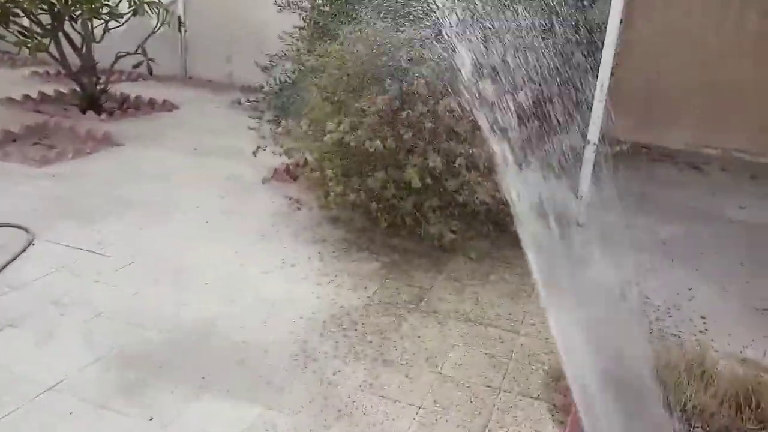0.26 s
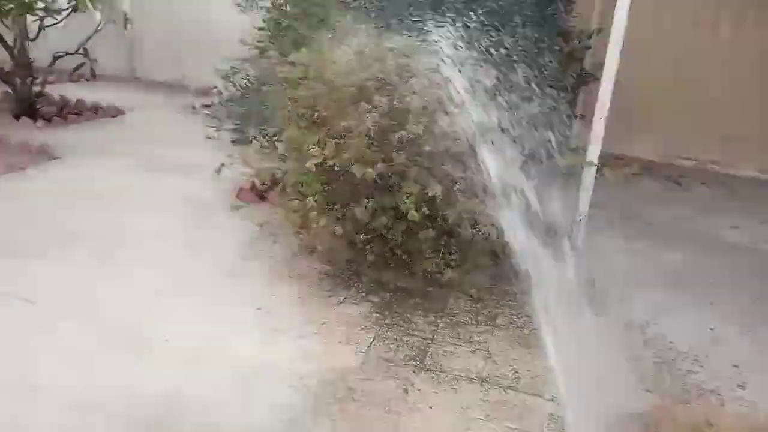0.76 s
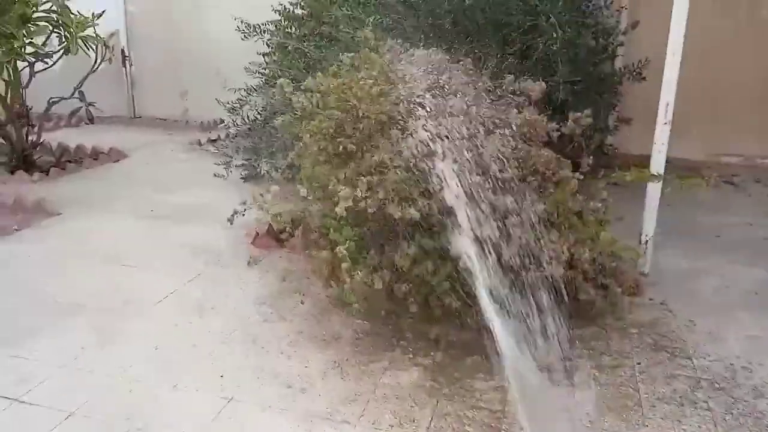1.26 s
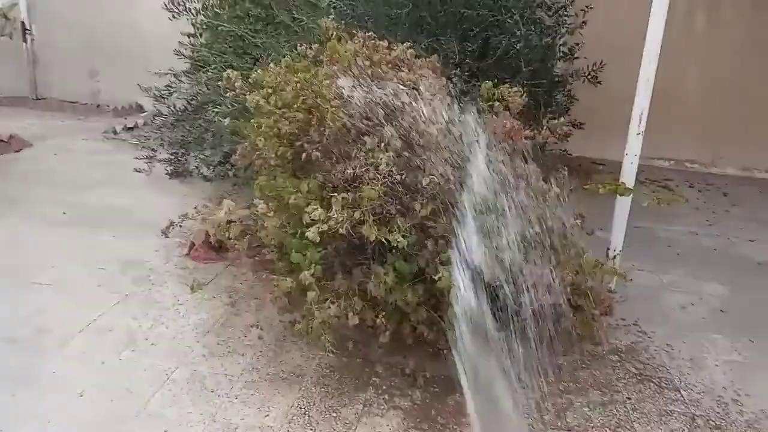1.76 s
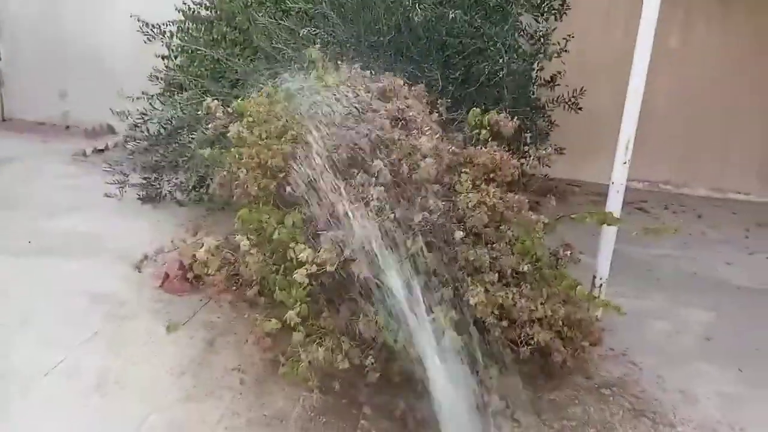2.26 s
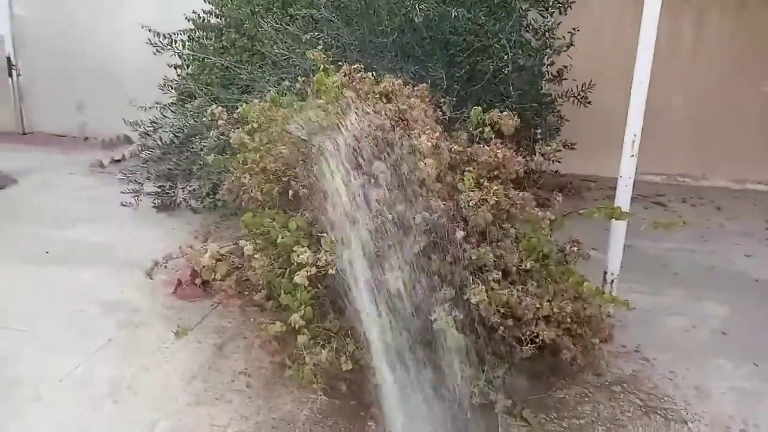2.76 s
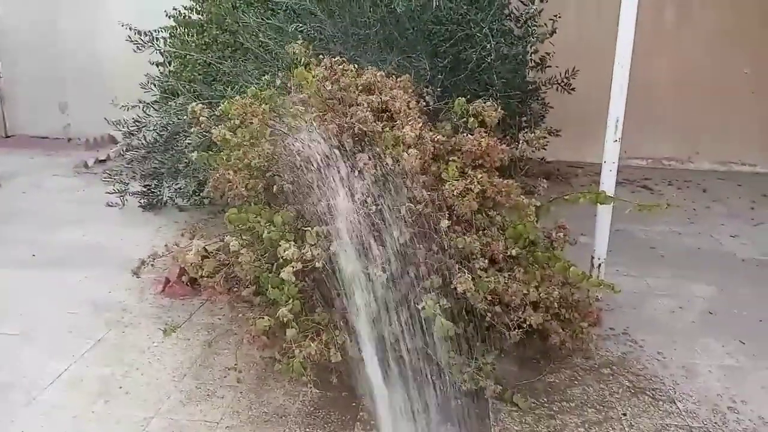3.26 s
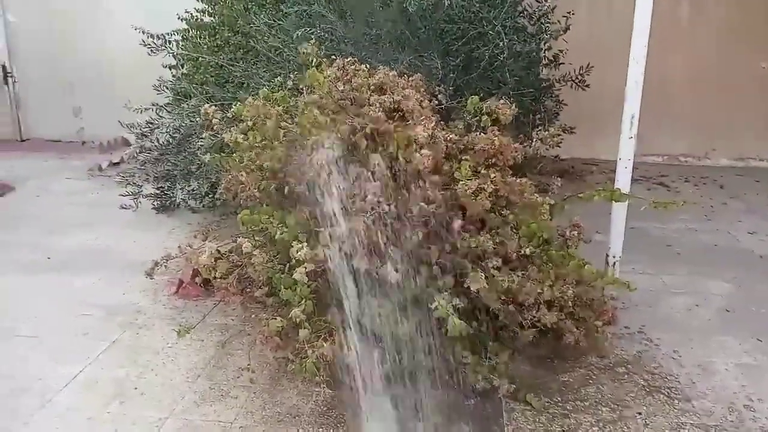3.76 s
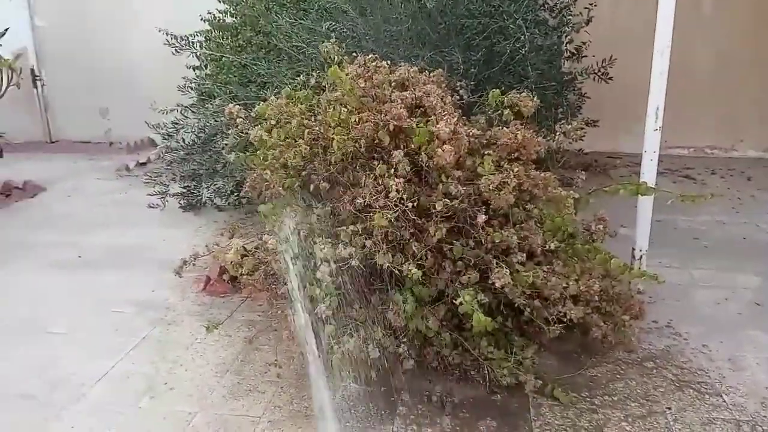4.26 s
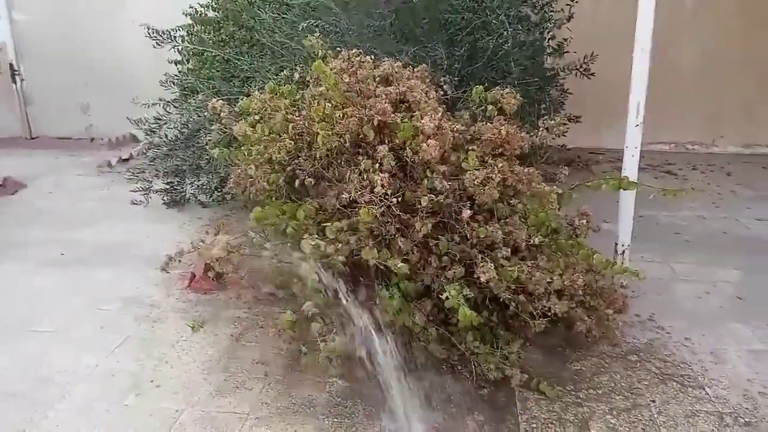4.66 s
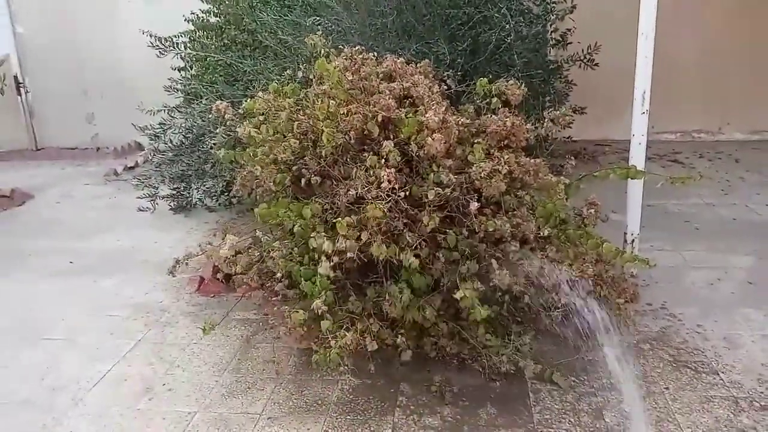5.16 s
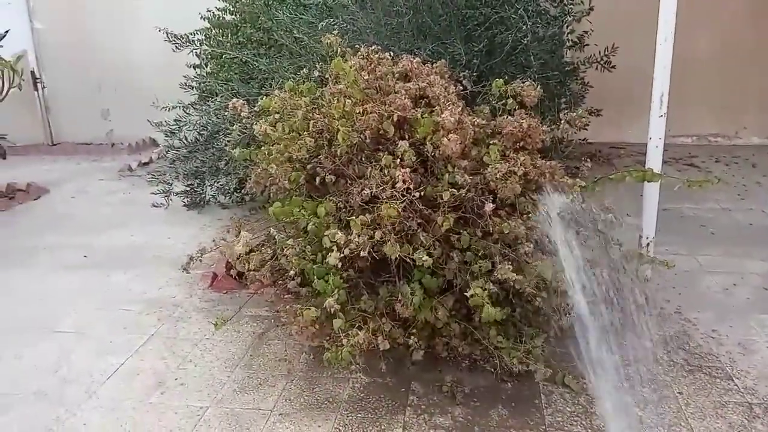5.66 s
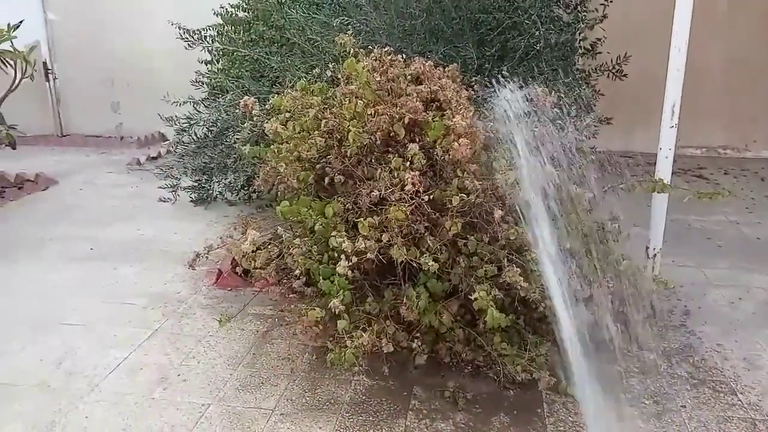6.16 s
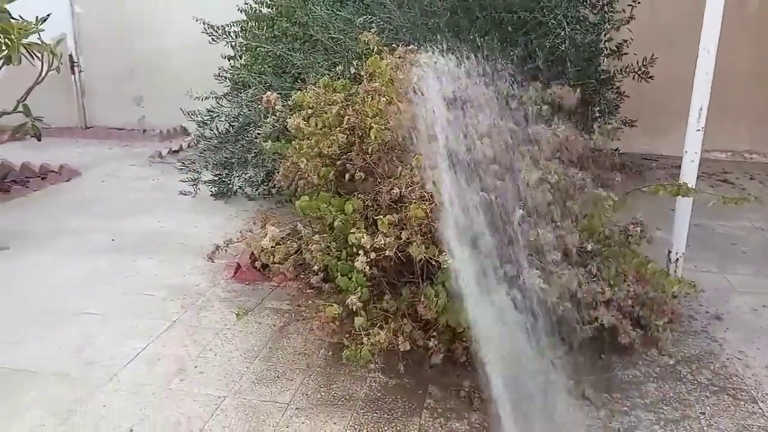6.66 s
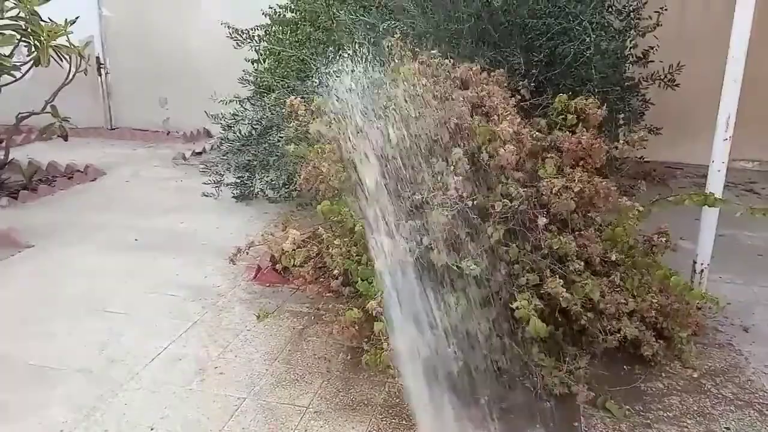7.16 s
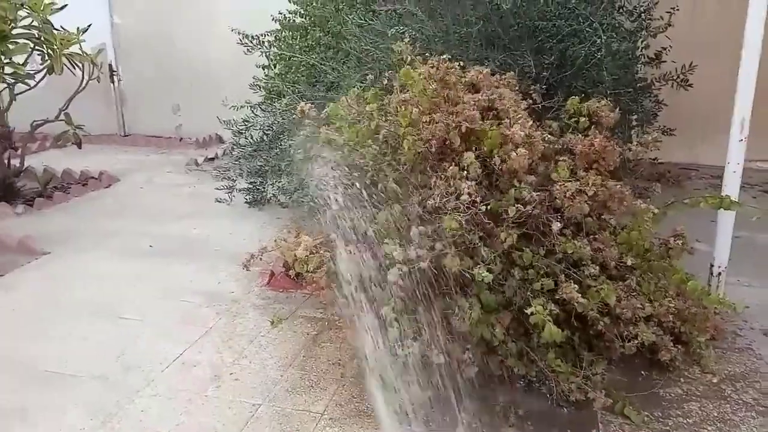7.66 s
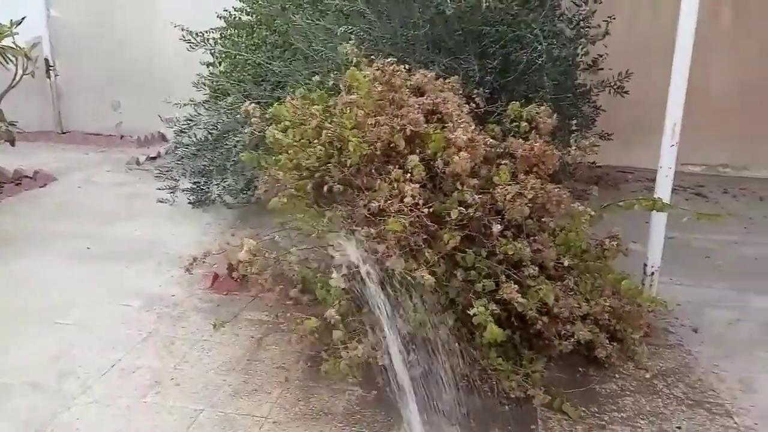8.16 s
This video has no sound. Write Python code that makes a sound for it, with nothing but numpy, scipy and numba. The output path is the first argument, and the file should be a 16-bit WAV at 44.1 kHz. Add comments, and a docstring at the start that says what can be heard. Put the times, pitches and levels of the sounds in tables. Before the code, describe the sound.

A hose jet sprays without pause onto a dry bush and the paving beneath, a bright dense hiss with patter, bubbling gurgle and fizz. It starts fuller, softens around three seconds, then shifts brighter as it sweeps across the paving near five. Leaves tick, slugs of water slap, wind rumbles softly, and a dull hand bump lands just before six seconds. Close handheld microphone in a walled courtyard, both channels alike.

```python
"""A garden hose sprays a dry shrub and the paving under it in a walled courtyard, heard from the hand that holds it.
Thousands of noise-like drop impacts a second and ringing bubbles gurgle, patter, splash and fizz over a low thrum.
Slugs of water slap as bursts of filtered noise, stiff leaves tick, glugs ring low and one fat drop plops.
Gusts rumble as noise and wind buffets push as short low swings on the microphone; the hand bumps it once with
low pushes and dull noise, and a machine's wavering tones hum faintly far off.
"""
import sys
import numpy as np
from scipy import signal
from scipy.fft import rfft, irfft
from scipy.io import wavfile
from scipy.ndimage import uniform_filter1d
from numba import njit

SR = 44100
rng = np.random.default_rng(int(sys.argv[2]) if len(sys.argv) > 2 else 0)


def inscribe(sig):
    """Save sig as 16-bit PCM at rate SR to the path in sys.argv[1].

    A 1-D sig is mono; a 2-D sig holds one channel per row.
    Samples are clipped to [-1, 1] before scaling.
    """
    pcm = np.round(np.clip(np.atleast_2d(sig).T, -1, 1) * 32767)
    wavfile.write(sys.argv[1], SR, pcm.astype(np.int16))


N = 370973  # length of the scene in samples


def undb(db):
    """Decibels to gain."""
    return 10 ** (np.asarray(db) / 20)


def unit(x):
    """Scale to rms 1."""
    return x / np.sqrt(np.mean(x ** 2))


def curves(table):
    """Each column of a table after the time, joined by straight lines."""
    s, *columns = np.transpose(table)
    t = np.arange(N) / SR
    return [np.interp(t, s, column) for column in columns]


def noise(length=N):
    """White noise."""
    return rng.standard_normal(length)


def band(x, lo_hz, hi_hz, order=2):
    """Butterworth band-pass."""
    edges = [lo_hz, min(hi_hz, 0.49 * SR)]
    return signal.sosfilt(signal.butter(order, edges, "band", fs=SR, output="sos"), x)


@njit
def svf(x, hz, width_hz):
    """State-variable band-pass with a moving centre, gain 1 at the centre."""
    y, band_state, low_state = np.empty(len(x)), 0., 0.
    for i in range(len(x)):
        g, damping = np.tan(np.pi * hz[i] / SR), width_hz / hz[i]
        v = (band_state + g * (x[i] - low_state)) / (1 + g * (g + damping))
        band_state = 2 * v - band_state
        low_state += 2 * g * v
        y[i] = damping * v
    return y


def colour(x, spectrum, size=2048):
    """Ring x through the minimum-phase response that has this spectrum."""
    hz, db = np.transpose(spectrum)
    bin_hz = np.arange(size // 2 + 1) * SR / size
    log_gain = np.log(undb(np.interp(np.log(bin_hz + 1), np.log(hz), db)))
    # folding the cepstrum forward in time makes the response causal
    cepstrum = irfft(log_gain)
    cepstrum[1:size // 2] *= 2
    cepstrum[size // 2 + 1:] = 0
    response = irfft(np.exp(rfft(cepstrum)))
    return signal.fftconvolve(x, response)[:N]


def walk(rate):
    """Random levels drawn rate times a second, smoothed into slopes; rms 1."""
    k = max(int(SR / rate), 2)
    steps = np.repeat(noise()[:N // k + 1], k)
    return unit(uniform_filter1d(steps, k)[:N])


def add(out, s, sound):
    """Mix a short sound in at time s."""
    i = max(int(s * SR), 0)
    out[i:i + len(sound)] += sound[:max(N - i, 0)]


def drops(per_s, scatter_db):
    """Impacts at random moments and of either sign: many small ones, a few large."""
    size = undb(scatter_db * np.minimum(rng.exponential(size=N), 6))
    lands = rng.random(N) < per_s / SR
    return unit(lands * size * rng.choice([-1, 1], N))


def bubbles(lo_hz, hi_hz, per_s, cycles, scatter_db, glide):
    """Tiny air pockets in the water film ring, die away over some cycles and rise in pitch."""
    out = np.zeros(N)
    for when, pitch, size in rng.random((int(per_s * N / SR), 3)):
        hz = lo_hz * (hi_hz / lo_hz) ** pitch
        turn = np.arange(int(4 * cycles * SR / hz)) * hz / SR
        rising = turn * (1 + glide * turn / cycles / 2)
        ring = np.sin(2 * np.pi * rising) * np.exp(-turn / cycles)
        gain = undb(-scatter_db * np.log(max(size, np.exp(-4))))
        add(out, when * N / SR, gain * ring)
    return unit(out)


# Colour of a drop on bare paving: (frequency [Hz], level [dB])
PAVING_COLOUR = [(470, -36), (800, 1.5), (940, -10), (1700, -13), (1950, -11), (2440, -15), (2660, -18),
                 (2980, -23.5), (3410, -23), (4160, -15.5), (6590, 10), (7840, -5), (9680, -13),
                 (13400, -26), (15500, -20)]
# Colour of a drop on dry outer leaves: (frequency [Hz], level [dB])
LEAF_COLOUR = [(470, 4), (800, -6), (917, -6.5), (1380, -4.5), (1840, -9), (2270, -4), (3290, -8),
               (3960, -5.5), (4480, -3.5), (5820, 2.5), (6670, 1.5), (7930, -9), (9680, -5), (14700, -10.5),
               (15500, -2)]
# Colour of a drop deep in the crown: (frequency [Hz], level [dB])
CROWN_COLOUR = [(470, -36), (800, 21.5), (1000, 4.5), (1600, -7.5), (2030, 2.5), (2540, -12), (2980, 0),
                (3370, -11), (4270, -3), (5080, -9.5), (6590, 5.5), (7550, 3.5), (8230, -5), (9920, -13),
                (15500, -24)]


def shower(impacts, lo_hz, hi_hz, place):
    """One size of drop sounds in its own range, crossfaded between the surfaces under the jet."""
    sound = band(impacts, lo_hz, hi_hz, order=6)
    mix = 0
    for k, surface in enumerate((PAVING_COLOUR, LEAF_COLOUR, CROWN_COLOUR)):
        share = np.clip(1 - abs(np.clip(place, 0, 2) - k), 0, 1)
        mix = mix + np.sqrt(share) * unit(colour(sound, surface))
    return mix


# How hard the water lands: (time [s], level [dB])
FLOW_LEVEL = [(0, -42.5), (0.55, -41.5), (0.9, -42.5), (1.35, -40.5), (1.5, -43), (2.0, -43.5),
              (2.3, -45.5), (2.95, -48.5), (3.95, -47), (4.15, -45.5), (4.55, -45.5), (4.8, -44),
              (5.1, -45.5), (5.35, -42.5), (5.9, -44.5), (6.35, -47), (6.52, -45), (6.8, -46),
              (7.15, -48.5), (7.95, -46), (8.08, -44.5), (8.2, -46), (8.41, -44.5)]
# Where the jet lands: (time [s], place [0 paving, 1 dry outer leaves, 2 deep in the crown])
JET_AIM = [(0, 1), (2, 1), (2.7, 1.07), (3.8, 1.12), (4.6, 1.03), (5.08, 0.85), (5.24, 0.39), (5.8, 0.77),
           (6.25, 0.78), (6.55, 0.89), (6.8, 1.13), (7.5, 1.19), (8.41, 0.98)]
# Treble of the spray: (time [s], fizz gain [dB], extra gain of the finest mist [dB])
MIST_LEVEL = [(0, -3, -0.5), (.5, -1.5, 1), (1.0, 1, -1.5), (1.2, 2.6, -3.5), (1.55, 1, -4),
              (2.7, 0.5, 0.5), (3.8, 0, -0.5), (4.35, -1, 4), (4.55, 2, 3), (4.76, -4.5, 1.5),
              (4.92, -1.5, 4), (5.2, 2, -0.5), (5.45, -1.5, 2.5), (5.66, -3, 3.5), (5.85, -1, 3.5),
              (6.7, 0.5, -3), (7.3, 0.5, -2), (7.6, 1.5, 0), (7.8, 0, 4), (8.0, 0.5, 0), (8.41, 0, 0)]
# The jet churns the wet foot of the shrub: (time [s], gurgle gain [dB], patter gain [dB])
CHURN_LEVEL = [(0, -1, 0), (.45, -0.5, -2), (.62, 1, -0.5), (1.1, 0, -2), (1.35, 0, -1), (3, 0.5, 1),
               (3.4, 0, .7), (4.2, 1, 0.4), (4.56, 2, 2), (4.7, -1.5, -0.5), (4.95, 4, 0.5), (5.25, 1, 1),
               (5.4, -2, -0.5), (5.65, -0.5, -1), (6.2, 0, -1), (6.5, -0.5, 0), (6.98, 0, -3.5),
               (7.06, 0, -1), (7.35, -2.5, 0.5), (7.5, 1, 0.5), (8.41, 0.5, 0)]
# Share of each drop size by surface: (on paving [dB], on outer leaves [dB], in the crown [dB])
GURGLE_SHARE = (-10.5, -14.5, -18)
PATTER_SHARE = (-18, -8.5, -12.5)
SPLASH_SHARE = (-2.5, -5, -7.5)
FIZZ_SHARE = (-4, -5, -10)


def spray(splutter_db=1.59, churn_takes=0.15):
    """The jet lands in lumps shared by four drop sizes; the surface sets their mix, and churning robs the splash."""
    flow_db, = curves(FLOW_LEVEL)
    place, = curves(JET_AIM)
    fizz_db, mist_db = curves(MIST_LEVEL)
    churn_db, patter_db = curves(CHURN_LEVEL)
    lumps_db = splutter_db * (0.092 * walk(15) + 0.49 * walk(45) + 0.16 * walk(130) + 0.43 * walk(600))

    # impacts of each size; all but the finest also trap bubbles
    core = drops(8000, 1.2) * undb(0.24 * lumps_db)
    core = core + undb(-15) * bubbles(811.2, 1724, 150, 17.6, 1.7, glide=0.0525)
    big = drops(9000, 2.2) * undb(0.55 * lumps_db)
    big = big + undb(-14) * bubbles(1710, 4390, 250, 21.7, 1.73, glide=0.04)
    middling = drops(13000, 2.7) * undb(0.79 * lumps_db + 0.35 * walk(80))
    middling = middling + undb(-14) * bubbles(4370, 8034, 200, 31, 1.5, glide=0.017)
    fine = drops(12000, 2.1) * undb(lumps_db + 0.2 * walk(60))
    # the finest mist flickers by itself
    mist_gain = undb(mist_db + walk(160))
    fine = fine + band(fine, 11200, 14700, order=1) * (mist_gain - 1)

    def share(surfaces_db):
        return undb(np.interp(place, np.arange(3), surfaces_db))

    gurgle = shower(core, 764, 1816, place) * share(GURGLE_SHARE) * undb(churn_db)
    patter = shower(big, 1646, 4294, place) * share(PATTER_SHARE) * undb(patter_db)
    splash = shower(middling, 4320, 8720, place) * share(SPLASH_SHARE)
    fizz = shower(fine, 8560, 15050, place) * share(FIZZ_SHARE) * undb(fizz_db)
    treble = (splash + fizz) * undb(-churn_takes * churn_db)
    return (gurgle + patter + treble) * undb(flow_db)


# A hollow below the patter: (time [s], centre before wander [Hz])
HOLLOW_PITCH = [(0, 760), (1.5, 710), (2.3, 607), (2.7, 516), (4.4, 453), (4.85, 483), (5.08, 750),
                (5.77, 520), (7.2, 600), (8.41, 460)]


def hollow(x, width_hz=350.0, depth=0.76, wander_octaves=0.16):
    """Scoop a wandering dip out of the low middle by subtracting a band-passed copy."""
    centre_hz, = curves(HOLLOW_PITCH)
    centre_hz = centre_hz * 2 ** (wander_octaves * walk(7.4))
    return x - depth * svf(x, centre_hz, width_hz)


# Low body of the water: (time [s], level [dB], centre before wander [Hz])
THRUM_BODY = [(0, -58.5, 370), (1.1, -63, 360), (1.7, -60, 325), (2.35, -67.5, 253), (3.1, -71, 258),
              (3.5, -64.5, 199), (4.1, -67, 200), (4.6, -67.5, 214), (5.4, -64, 218), (6.1, -66, 199),
              (6.55, -66, 210), (7.1, -69, 179), (8.41, -68, 198)]


def thrum(width_hz=500.0, lumpy_db=5.5, wander_octaves=0.56):
    """The low body of the water: lumpy noise through two resonances in a row at a wandering pitch."""
    level_db, centre_hz = curves(THRUM_BODY)
    centre_hz = centre_hz * 2 ** (wander_octaves * np.tanh(walk(18)))
    lumps = band(noise(), 110, 1000, order=3) * undb(lumpy_db * np.tanh(walk(35)))
    body = svf(svf(lumps, centre_hz, width_hz), centre_hz, width_hz)
    return unit(body) * undb(level_db)


# Gusts over the microphone: (start [s], length [s], added rumble level [dB], flutter level [dB])
GUST_EVENTS = [(0.257, 0.36, -56.5, -72), (0.854, 0.12, -61, -65), (1.436, 0.11, -52, -82),
               (1.84, 0.25, -61.5, -74), (2.392, 0.26, -55.5, -76), (4.374, 0.12, -62, -78),
               (5.604, 0.42, -63, -63), (6.043, 0.4, -63.5, -81), (6.984, 0.15, -60, -68),
               (7.444, 0.29, -59.5, -75)]


def breeze(calm_db=-73, attack_s=0.069, release_s=0.054, uneven_db=3.5, flutter_hz=240):
    """Gusts rise, hold and die back to calm; large eddies rumble on the microphone, small ones flutter."""
    t = np.arange(N) / SR
    large, small = undb(calm_db), 0
    for s, length_s, rumble_db, flutter_db in GUST_EVENTS:
        rise, fall = (t - s) / attack_s, (s + length_s - t) / release_s
        swell = np.clip(np.minimum(rise, fall) + 0.5, 0, 1)
        large = large + swell * undb(rumble_db)
        small = small + swell * undb(flutter_db)
    pressure = np.tanh(2 * unit(band(noise(), 44.5, 147)))
    rumble = unit(band(pressure, 46, 196) * undb(uneven_db * np.tanh(walk(25))))
    flutter_pitch = flutter_hz * 2 ** (0.17 * walk(23))
    eddies = svf(band(noise(), 100, 500, order=3), flutter_pitch, 92.0)
    flutter = unit(eddies * undb(9.9 * np.tanh(walk(24))))
    return large * rumble + small * flutter


def tone(hz, drift_hz, rough):
    """A drifting line, roughened in level and phase by its way through moving air."""
    phase = 2 * np.pi * np.cumsum(hz + drift_hz * walk(14)) / SR
    fading = undb(rough * (7.6 * np.tanh(walk(17)) + 9.5 * np.tanh(walk(47))))
    return unit(fading * np.sin(phase + rough * walk(35)))


# The distant hum swells and fades: (time [s], hum level [dB], octave level [dB])
HUM_LEVEL = [(0, -72, -64.5), (0.3, -55, -64.5), (0.75, -67, -66), (0.9, -55.5, -62), (1.08, -68, -57),
             (1.3, -57, -72.5), (1.5, -64, -64), (1.7, -68, -67), (2.0, -64, -63.5), (2.15, -66.5, -72),
             (2.45, -63, -69.5), (2.9, -61.5, -80.5), (3.1, -66, -81), (3.5, -60, -64), (3.7, -64, -67),
             (3.9, -78, -86), (4.05, -61, -89), (4.25, -63, -85), (4.4, -62, -67), (4.65, -74, -66),
             (4.9, -63, -68), (5.1, -68, -80), (5.28, -59, -82), (5.55, -59.5, -68.5), (6.2, -67, -67),
             (6.45, -65.5, -84), (6.68, -69, -75), (6.9, -77, -61), (7.05, -58, -71.5), (7.32, -60, -83),
             (7.52, -63.5, -72), (7.95, -71, -71), (8.18, -62, -65.5), (8.41, -60, -72)]
# The machine's thin tones: (time [s], middle tone level [dB], whine level [dB])
WHINE_LEVEL = [(0, -88, -84), (2.3, -90, -78), (2.7, -77, -81), (4.1, -77, -72), (4.7, -77, -67.5),
               (5.3, -90, -68), (8.41, -96, -66)]


def machine(waver_db=0.1):
    """A hum and its near octave waver apart, under a faint middle tone and a thin whine."""
    hum_db, octave_db = curves(HUM_LEVEL)
    middle_db, whine_db = curves(WHINE_LEVEL)
    hum = tone(121, 4, 0.65) * undb(hum_db + waver_db * np.tanh(walk(6.6)))
    octave = tone(240.5, 2, 0.55) * undb(octave_db + waver_db * np.tanh(walk(6.6)))
    middle = tone(574, 3, 0.8) * undb(middle_db)
    whine = tone(2352.3, 1.3, 0.27) * undb(whine_db)
    return (hum + octave) * dips() + middle + whine


# Hollow glugs as water pours into a pocket: (centre time [s], length [s], level [dB], centre [Hz])
GLUG_EVENTS = [(0.032, .1, -59, 350), (0.22, .09, -59, 330), (0.552, .12, -67, 560),
               (0.802, 0.17, -60.5, 380), (1.336, .1, -65, 470), (2.199, 0.17, -64, 292),
               (2.98, 0.073, -64.5, 336), (3.946, .07, -68.5, 348), (4.65, .4, -73, 724),
               (5.08, 0.25, -68.5, 507), (5.308, 0.096, -62.5, 380), (6.876, 0.17, -61.5, 295),
               (7.67, 0.094, -64, 230), (7.81, 0.12, -71, 550), (8.196, 0.15, -63, 214)]


def glugs(spread=1.147):
    """Water churns in a pocket, which rings roughly around one low pitch, swelling and fading."""
    out, t = np.zeros(N), np.arange(-SR // 2, SR // 2) / SR
    for s, length_s, db, hz in GLUG_EVENTS:
        ring = np.tanh(unit(band(noise(len(t)), hz / spread, hz * spread)))
        swell = np.exp(-(2 * t / length_s) ** 2)
        glug = undb(db) * swell * unit(ring)
        add(out, s + t[0], glug[s + t >= 0])  # leave out what falls before the start
    return out


# Single low pushes on the microphone: wind buffets, and at 5.83 s the thump of the hand's bump:
# (centre time [s], level [dB], pitch [Hz])
PUSH_EVENTS = [(0.13, -35.5, 114), (0.908, -45, 105), (1.463, -40.5, 73), (1.529, -46, 105),
               (2.14, -49, 59), (2.332, -47, 85), (2.465, -40, 118), (4.447, -39.5, 100), (5.792, -44, 80),
               (5.833, -31.5, 131), (5.8452, -41, 150), (6.09, -47, 115), (6.554, -50, 83),
               (6.783, -44.5, 115), (7.03, -46, 74.4), (7.13, -40, 125), (7.177, -46.5, 70),
               (7.613, -47, 93)]


def pushes(cycles=0.29):
    """A wind buffet or the hand's thump swings the diaphragm for an uneven cycle or two, from a random phase."""
    out, t = np.zeros(N), np.arange(-SR // 16, SR // 16) / SR
    for s, db, hz in PUSH_EVENTS:
        phase = 2 * np.pi * rng.random()
        swell = 1 / np.cosh(np.clip(hz * t / cycles, -20, 20))
        push = np.sin(2 * np.pi * hz * t + phase) * swell
        add(out, s + t[0], undb(db) * push)
    return out


# Slugs of water slapping down: (time [s], level before trim [dB], splash centre [Hz])
SLUG_EVENTS = [(0.424, -30, 6460), (0.4752, -30, 5760), (0.743, -30, 6270), (0.921, -31, 6200),
               (1.042, -31, 6200), (2.109, -34, 6320), (4.038, -32.5, 6370), (4.0903, -30, 6300),
               (4.258, -37, 6500), (4.326, -36, 6500), (4.586, -31, 6200), (4.694, -31, 6230),
               (4.7576, -35, 5860), (5.645, -37, 5850), (5.674, -29, 6400), (7.204, -36, 6400),
               (7.5721, -38, 6680), (7.9662, -33, 6030), (8.054, -33, 5940), (8.0894, -29.5, 6500)]


def slugs(rise_s=0.0013, spread=1.12, fizz_db=-6, trim_db=-9):
    """Each slug bursts into a quick cloud of droplets, with a broader fizz mixed in."""
    out, t = np.zeros(N), np.arange(SR // 20) / SR
    swell = t / rise_s * np.exp(1 - t / rise_s)
    for s, db, hz in SLUG_EVENTS:
        cloud = noise(len(t))
        splash = unit(band(cloud, hz / spread, hz * spread))
        fizz = unit(band(cloud, 3800, 15000, order=1))
        add(out, s, undb(db + trim_db) * swell * (splash + undb(fizz_db) * fizz))
    return out


# Single sharp drops on stiff leaves:
# (time [s], peak before trim [dB], ring centre [Hz], rustle decay [s], width [octaves])
TICK_EVENTS = [(0.442, -37.5, 1400, 0.0027, 0.89), (0.478, -29, 5430, .004, .7),
               (1.044, -32, 4500, .002, .6), (1.59, -23, 10500, .001, 1.2), (1.928, -26, 10500, .001, 1),
               (2.309, -34, 4100, .0015, 0.84), (2.569, -31, 11000, .001, 1), (2.622, -35, 4300, .002, .7),
               (2.671, -35.5, 2230, .004, 0.66), (2.8079, -28, 3100, .0025, 1.3),
               (3.0368, -31, 13000, .0007, .7), (3.066, -39, 4360, .002, .4), (3.575, -33, 4200, .004, 0.3),
               (3.608, -36.5, 4100, .003, .4), (3.706, -35, 4800, .002, .45), (4.039, -30, 2900, .002, 1.1),
               (4.051, -36, 1800, .005, 1.9), (4.2116, -25, 11000, .001, 1), (4.2896, -25, 9500, .0006, 1),
               (4.3622, -26, 6060, .0014, 2), (4.431, -35, 2580, .004, 0.85), (4.587, -28, 10500, .0012, 1),
               (4.596, -36, 2300, .003, .6), (4.872, -30, 9700, .001, .6), (4.892, -34, 1700, .002, 1.6),
               (5.148, -29, 8000, .001, 1.3), (6.979, -45.5, 1200, 0.0069, 0.73),
               (7.042, -40, 2500, .003, 0.53), (7.36, -35, 2300, .001, 1.6), (7.388, -39, 2900, .002, 0.84),
               (7.561, -38, 1900, .002, 1.4), (8.09, -34, 2000, .004, 1.4), (8.18, -27, 11500, .001, 1),
               (8.3467, -29, 11000, .001, 1), (8.393, -27, 10500, .001, 1)]


def ticks(rustle=0.45, trim_db=-4.5):
    """A sharp contact and its dying rustle ring a stiff leaf: narrow bands have a pitch, wide ones click."""
    out, t = np.zeros(N), np.arange(SR // 30) / SR
    for s, db, hz, decay_s, octaves in TICK_EVENTS:
        contact = (t == 0) + rustle * noise(len(t)) * np.exp(-t / decay_s)
        spread = 2 ** (octaves / 2)
        ring = band(contact, hz / spread, hz * spread)
        add(out, s, undb(db + trim_db) * ring / abs(ring).max())
    return out


def courtyard(x, t60_s=0.12, wet_db=-12):
    """The walls send back a short, duller wash: decaying filtered noise that starts after 12 ms."""
    t = np.arange(SR // 2) / SR
    echo = band(noise(len(t)), 700, 8000, order=1) * undb(-60 * t / t60_s) * (t > 0.012)
    echo = echo / np.sqrt(np.sum(echo ** 2))
    return x + undb(wet_db) * signal.fftconvolve(x, echo)[:N]


def plop(at_s=1.0178, level_db=-37, hz=980):
    """One fat drop lands close by: a single swing of pressure, with hardly any ring."""
    turn = 2 * np.pi * hz * (np.arange(N) / SR - at_s)
    return undb(level_db) * turn * np.exp((1 - turn ** 2) / 2)


# The low end sinks briefly: (centre time [s], length [s])
DIP_EVENTS = [(2.078, 0.066), (3.257, 0.047), (3.876, 0.28), (5.17, 0.039), (7.247, 0.098), (7.984, 0.07)]


def dips(depth_db=-12):
    """Gain of the low end: it sinks smoothly and comes back."""
    t = np.arange(N) / SR
    sunk = sum(np.exp(-(2 * (t - s) / length_s) ** 2) for s, length_s in DIP_EVENTS)
    return undb(depth_db * sunk)


def knock(at_s=5.836, level_db=-44.5, length_s=0.04):
    """The rough part of the hand's bump: dull noise swells quickly, holds for a few hundredths of a second and stops."""
    t = np.arange(N) / SR - at_s
    swell = np.exp(-(2 * t / length_s) ** 4)
    return undb(level_db) * swell * unit(band(noise(), 130, 356))


def scene():
    """Water in the courtyard, wind, the hand's bump and hum, the same in both channels."""
    water_and_wind = hollow(spray() + (thrum() + breeze()) * dips())
    impacts = courtyard(slugs() + ticks() + plop())
    mono = water_and_wind + impacts + glugs() + pushes() + knock() + machine()
    return np.array([mono, mono])


def record(dry, top_hz=15700):
    """The recorder cuts the top steeply."""
    return signal.sosfilt(signal.ellip(12, 0.1, 80, top_hz, fs=SR, output="sos"), dry)


dry = scene()
out = record(dry)
inscribe(out)
```